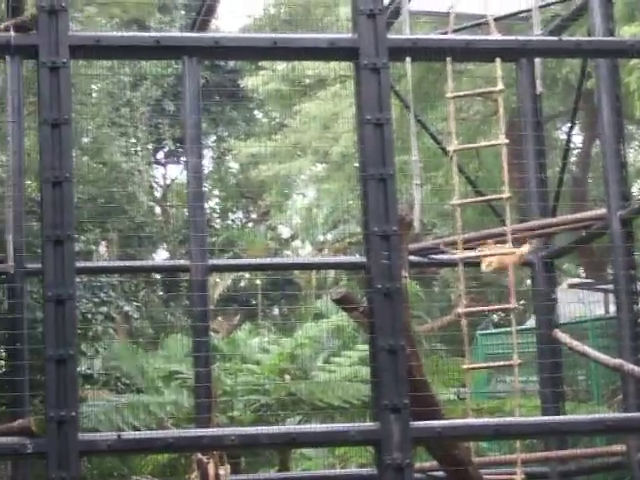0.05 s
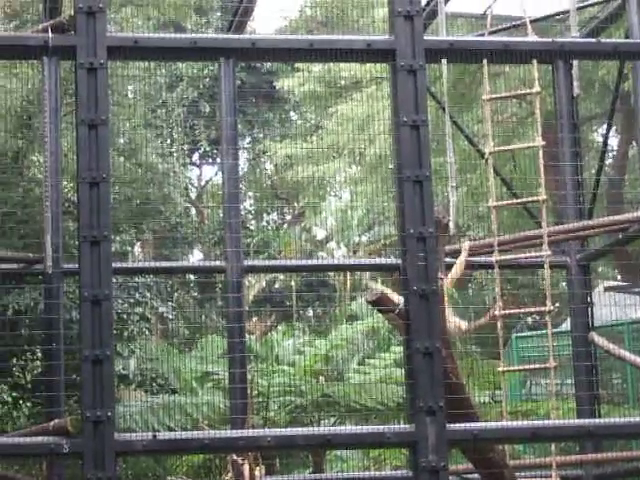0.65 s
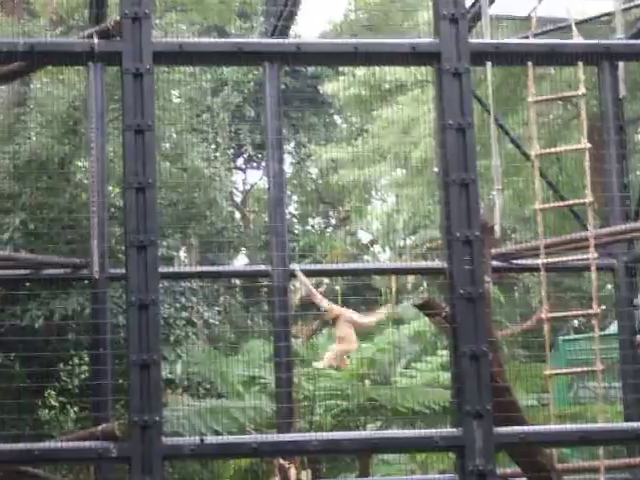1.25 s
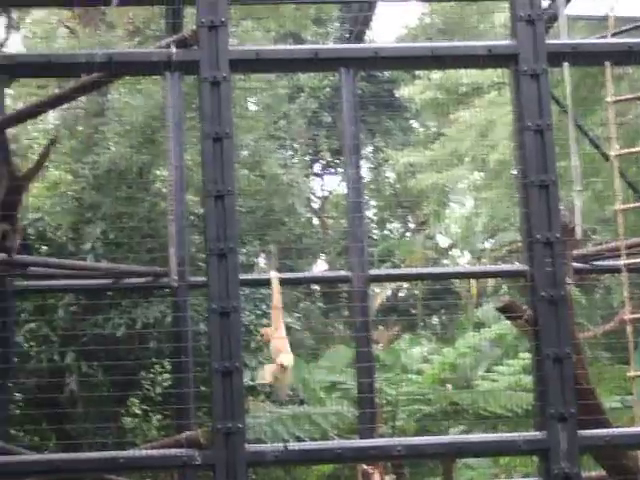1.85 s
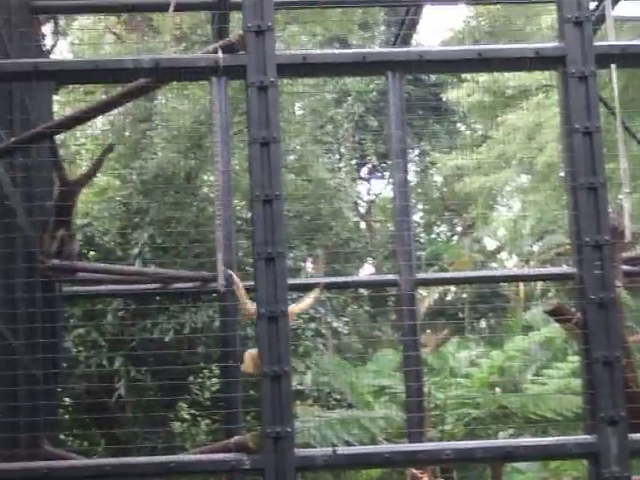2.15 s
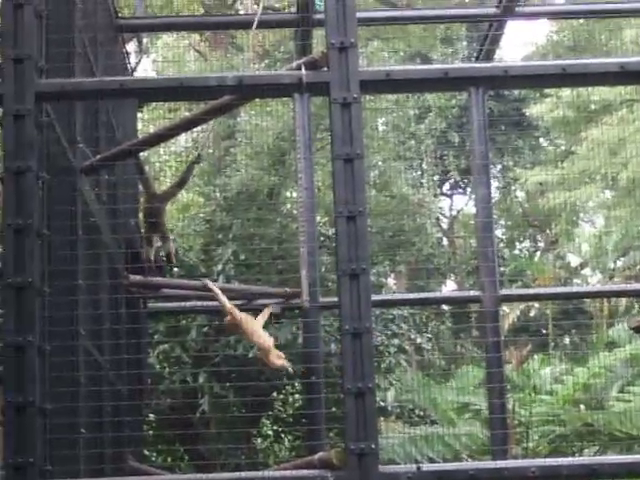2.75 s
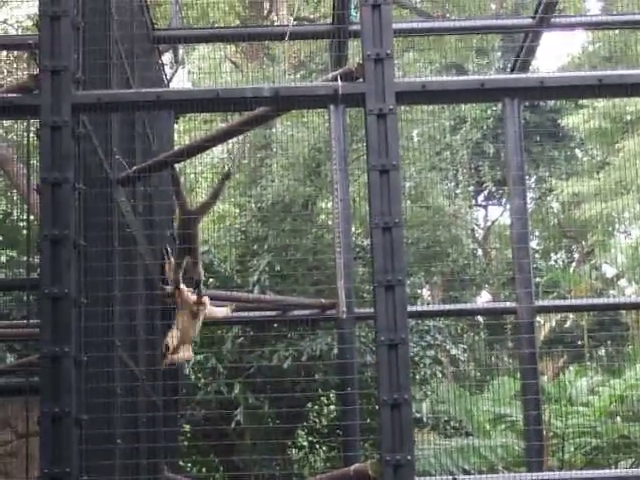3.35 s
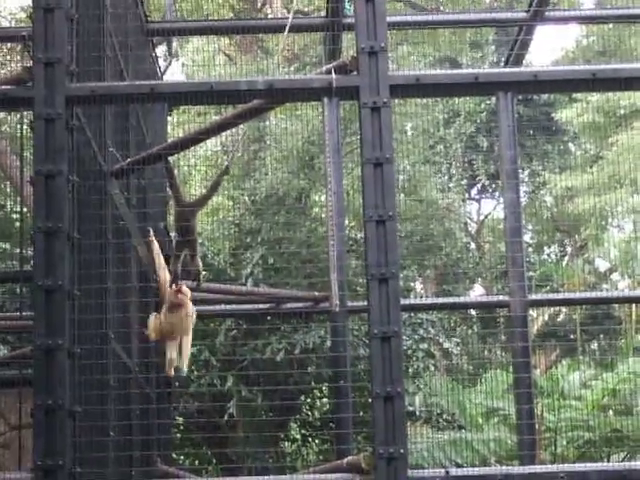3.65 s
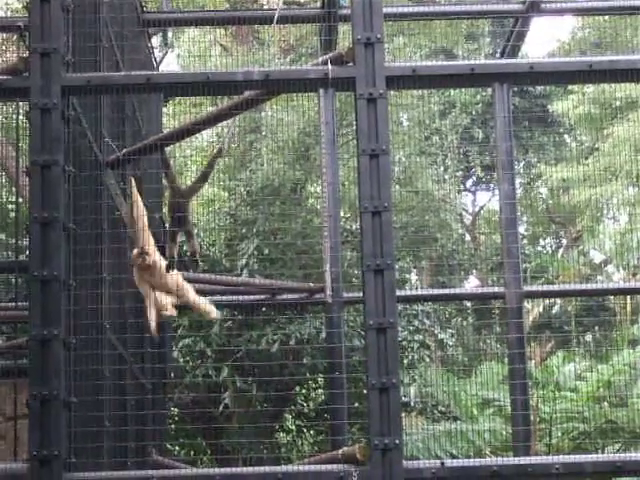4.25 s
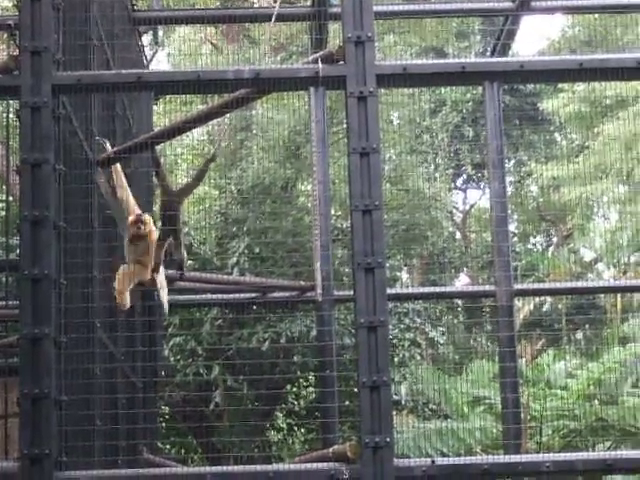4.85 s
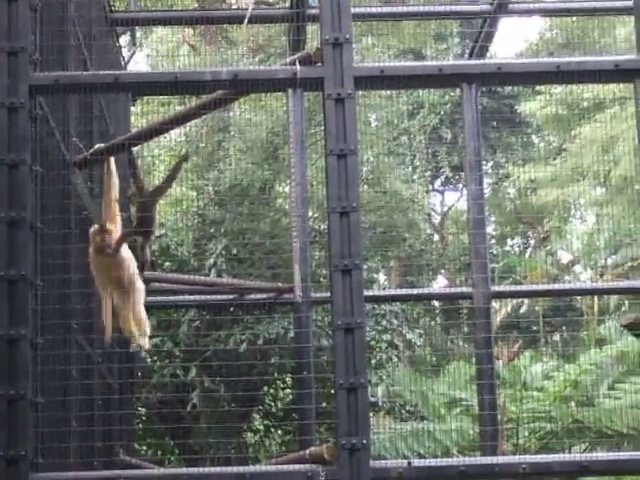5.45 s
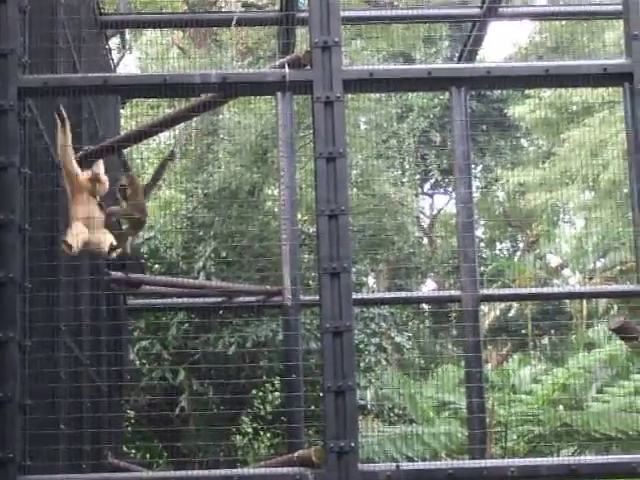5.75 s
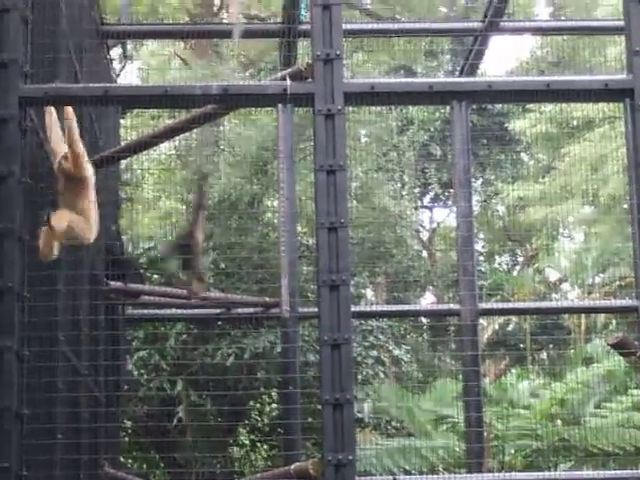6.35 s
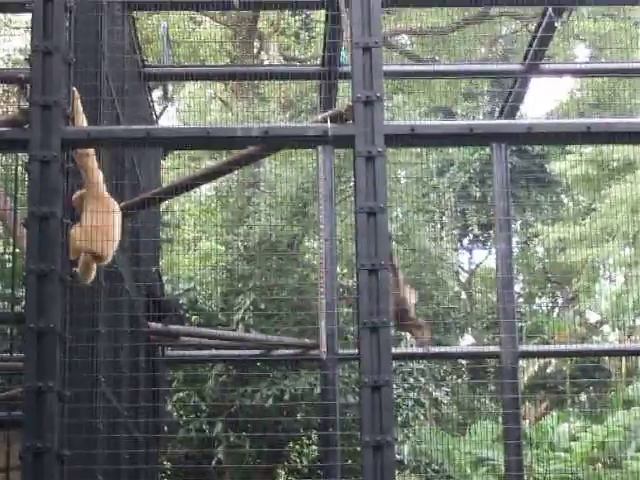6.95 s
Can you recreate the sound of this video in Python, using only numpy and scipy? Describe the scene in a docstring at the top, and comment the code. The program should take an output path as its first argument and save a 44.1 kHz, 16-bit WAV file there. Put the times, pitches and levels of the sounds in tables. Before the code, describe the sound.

Small birds chip and whistle in the trees around an outdoor cage, over a steady hiss of leaves and distant town with a faint machinery hum. Close to the microphone, a gibbon gives a gruff note that breaks into a short, piercing squeal. About three seconds later it squeals again, then grunts softly twice. The cries echo briefly off the cage and trees, and the mesh rustles faintly now and then.

```python
"""Gibbons calling in a tall outdoor cage, close to the microphone: twice a gruff onset breaks into a
piercing, arching squeal, then two soft grunts follow. The mesh rustles as an ape swings, and cage
walls and trees answer every call. Farther off, small birds chip and warble in the trees, over a
steady hiss of foliage and distant town with a faint machinery hum. Loud cries duck the microphone."""
import sys
import numpy as np
from scipy import signal
from scipy.fft import rfft, irfft, next_fast_len
from scipy.io import wavfile
from scipy.ndimage import uniform_filter1d, map_coordinates

SR = 44100
rng = np.random.default_rng(int(sys.argv[2]) if len(sys.argv) > 2 else 0)


def bounce(signal):
    """Save signal as a 16-bit WAV file at the path given by the first command-line argument."""
    frames = np.transpose(np.atleast_2d(signal))
    limited = np.clip(frames, -1, 1)
    pcm = np.round(limited * 32767).astype(np.int16)
    wavfile.write(sys.argv[1], SR, pcm)


N = 308259


def amp(db):
    """Decibels to gain."""
    return 10 ** (np.asarray(db) / 20)


def unit(x):
    """Scale to rms 1."""
    return x / np.sqrt(np.mean(x ** 2) + 1e-20)


def along(points, hz):
    """Read (freq_hz, value) points on a log frequency axis."""
    freqs, values = np.transpose(points)
    return np.interp(np.log(hz + 1), np.log(freqs + 1), values)


def wobble(rate, size):
    """A smooth random curve with `rate` knots a second."""
    knots = rng.standard_normal(int(size * rate / SR) + 4)
    return map_coordinates(knots, [np.arange(size) * rate / SR])


def filtered(x, response):
    """Shape x by a gain that is a function of frequency."""
    size = next_fast_len(len(x) + SR // 10)
    return irfft(rfft(x, size) * response(np.fft.rfftfreq(size, 1 / SR)), size)[:len(x)]


def noise(spectrum):
    """Noise of rms 1, coloured by (freq_hz, level_db) points."""
    return unit(filtered(rng.standard_normal(N), lambda hz: amp(along(spectrum, hz))))


def phase_of(hz):
    """Running phase of a moving pitch."""
    return 2 * np.pi * np.cumsum(hz) / SR


def add(track, start_s, sound):
    """Mix a sound into the track at start_s."""
    start = max(round(start_s * SR), 0)
    part = sound[:max(len(track) - start, 0)]
    track[start:start + len(part)] += part


# Spectrum of the air all around the microphone: freq_hz, level_db
HISS_SPECTRUM = [(12, -49.5), (20, -5), (43, 0.5), (96, -3), (124, -5), (145, -6), (259, -4), (352, -5.5),
                 (379, -6), (946, -9), (1700, -17.5), (2360, -16.5), (4560, -24), (7390, -26),
                 (8600, -34.5), (11200, -74), (18900, -120)]
# Its slow swell: time_s, gain_db
HISS_SWELL = [(0, -0.5), (1.5, 1.5), (2.8, -0.5), (3.999, 0.6), (5.5, -0.5), (7, 1)]
def foliage_and_town(level_db=-35.5, waver_db=0.78):
    """Surrounding leaves and the distant town merge into a gently wavering hiss."""
    swell_db = np.interp(np.arange(N) / SR, *np.transpose(HISS_SWELL))
    return amp(level_db + swell_db + waver_db * wobble(5.2, N)) * noise(HISS_SPECTRUM)


# Machinery a long way off: pitch_hz, level_db
HUM_TONES = [(96.5, -51), (194, -52.5)]
def machinery_hum(waver_db=3, drift=0.02005):
    """Two low tones of distant machinery, each wandering in level and pitch."""
    hum = np.zeros(N)
    for hz, db in HUM_TONES:
        gain = np.sqrt(2) * amp(db + waver_db * wobble(5, N))
        hum += gain * np.sin(phase_of(hz * (1 + drift * wobble(8, N))))
    return hum


# Spectrum of birds in the farthest trees: freq_hz, level_db
CHORUS_SPECTRUM = [(1500, -52.5), (2400, -6.5), (3100, 8), (3800, 1.5), (4600, -34.5), (6000, -61.5)]
def distant_chorus(level_db=-49, swell_db=2.6):
    """Birds too far off to tell apart blur into a swelling band."""
    return amp(level_db + swell_db * wobble(6.3, N)) * noise(CHORUS_SPECTRUM)


def bird_note(hz, buzz, waver=.018):
    """A wavering whistle along a pitch path; fast quavering turns it into a buzz."""
    size = len(hz)
    quaver = 1 + .09 * buzz * wobble(500, size)
    phase = phase_of(hz * quaver * (1 + waver * wobble(112.5, size)))
    return np.sqrt(2) * signal.windows.tukey(size, .6) * np.sin(phase)


# Buzzy glides, well back in the trees: start_s, length_s, mid_pitch_hz, glide_octaves, level_db, buzz_share
BUZZY_GLIDES = [(0, 0.066, 3664, 0, -38.5, .7), (.09, .17, 3850, .1, -44, .6),
                (0.284, 0.097, 3310, -0.46, -44, 0.5), (1.011, 0.15, 3540, -0.19, -47, 0.38),
                (1.255, .07, 3566, 0.35, -32.5, 0.57), (1.767, 0.074, 3156, 0.53, -35.5, 0.97),
                (2.28, 0.08, 3460, .22, -37.5, 0.68), (2.58, 0.023, 3467, .5, -41.5, 0.4),
                (3.203, 0.049, 3560, 1.4, -47, 0.45), (3.242, 0.085, 3640, .1, -42.5, 0.64),
                (3.484, 0.11, 3545, .18, -43, .9), (3.73, 0.053, 3550, .15, -33.5, 0.9),
                (3.986, 0.07, 4110, 0, -41, 0.6), (4.239, 0.033, 3325, 0.081, -37.5, 0.96),
                (4.518, 0.056, 3034, -0.66, -35.5, 0.64), (4.659, 0.072, 3060, 0.13, -40, .95),
                (4.934, 0.073, 3637, 0.27, -38, 0.67), (5.595, 0.049, 3470, -0.51, -41.5, .9),
                (5.687, .097, 3630, -0.69, -43, 0.76), (5.814, 0.079, 3290, -.55, -39, 0.7),
                (6.144, 0.091, 2540, -0.25, -43, 0.93), (6.337, 0.12, 3740, 0.38, -51, 0.28),
                (6.864, 0.051, 3680, 0.23, -36.5, .5)]
# Whistles from the same trees: start_s, length_s, pitch_hz, start_above_share, level_db
SLIDING_WHISTLES = [(.517, 0.063, 3380, .12, -40), (.62, .05, 2295, 0.081, -42.5),
                    (1.405, 0.051, 2490, .14, -36.5), (1.5, .05, 3316, 0.24, -39),
                    (1.572, 0.061, 2800, 0.16, -33.5), (2.506, .043, 2980, .07, -38.5),
                    (2.905, 0.082, 2685, .12, -45.5), (3.05, .11, 2980, .04, -40.5),
                    (3.7, 0.043, 2833, .13, -33.5), (3.87, 0.049, 2450, 0.051, -45),
                    (4.017, 0.044, 1950, -0.046, -45), (4.119, 0.05, 2850, -0.08, -40.5),
                    (4.178, 0.064, 2320, .03, -45), (4.275, 0.044, 2295, 0.036, -48),
                    (4.411, 0.047, 2290, 0.04, -43.5), (4.71, 0.059, 2690, 0.053, -37.5),
                    (6.509, 0.037, 3190, 0.092, -42)]
def songbirds(faint_count=16, faint_hz=2866, faint_octaves=0.35, faint_db=-49.5, settle_s=0.0223):
    """Songbirds trade buzzy glides and whistles that slide onto a held pitch, some faint and random."""
    song = np.zeros(N)
    for start_s, length_s, hz, octaves, db, buzz in BUZZY_GLIDES:
        glide_hz = hz * 2 ** (octaves * np.linspace(-.5, .5, int(length_s * SR)))
        add(song, start_s, amp(db) * bird_note(glide_hz, buzz))
    whistles = list(SLIDING_WHISTLES)
    for slot, (when, height) in enumerate(rng.random((faint_count, 2))):
        start_s = (slot + when) * N / SR / faint_count
        hz = faint_hz * 2 ** (faint_octaves * (2 * height - 1))
        whistles.append((start_s, 0.065, hz, .14, faint_db))
    for start_s, length_s, hz, above, db in whistles:
        t = np.arange(int(length_s * SR)) / SR
        slide_hz = hz * (1 + above * np.exp(-t / settle_s))
        add(song, start_s, amp(db) * bird_note(slide_hz, buzz=0.39))
    return song


def chip(top_hz, hold_s, sweep, glide_s=.0065, rise_s=0.012):
    """One note sweeps up with a slight buzz toward a thin high pitch."""
    t = np.arange(int((rise_s + hold_s) * SR)) / SR
    below = sweep * np.exp(-t / glide_s)
    hz = top_hz * (1 - below + (.002 + .15 * below) * wobble(1200, len(t)))
    swell = np.interp(t, [0, rise_s, rise_s + hold_s / 2, rise_s + hold_s], [0.33, 0.94, 0.62, 0.35])
    return np.sqrt(2) * swell * np.sin(phase_of(hz))


# Upswept chips in the nearer trees: start_s, top_hz, level_db, hold_s
BIRD_CHIPS = [(0, 7050, -30.5, 0.014), (.26, 6720, -25.5, 0.018), (0.542, 6540, -28.5, 0.032),
              (.914, 6430, -26.5, 0.034), (1.315, 6400, -27, 0.028), (1.913, 6480, -27.5, 0.031),
              (3.34, 5470, -36.5, 0.024), (3.459, 5720, -33.5, 0.019), (3.585, 5470, -35.5, .018),
              (3.705, 5570, -33.5, 0.013), (3.825, 5300, -39, 0.0058), (3.917, 4720, -37.5, 0.02)]
def small_birds(flick_db=-14, flick_lead_s=0.041):
    """Small birds chip, announcing each note with a faint, higher flick."""
    song = np.zeros(N)
    for start_s, top_hz, db, hold_s in BIRD_CHIPS:
        flick = chip(1.2 * top_hz, hold_s=0.012, sweep=0.36, glide_s=0.016)
        add(song, start_s - flick_lead_s, amp(db + flick_db) * flick)
        add(song, start_s, amp(db) * chip(top_hz, hold_s, sweep=.34))
    return song


# Mesh and leaves shaken at the cage: peak_s, length_s, level_db
MESH_SHAKES = [(1.172, .1, -48), (1.3, 0.12, -42), (2.592, .05, -43), (3.59, 0.016, -43),
               (4.75, 0.17, -48.5), (6.764, .14, -48)]
# Spectrum of their rustle: freq_hz, level_db
MESH_SPECTRUM = [(2000, -19), (4500, -4), (7500, -5), (9000, -17)]
def mesh_rustle(grain_db=3):
    """A swinging ape sets off brief, grainy shivers of mesh and leaves."""
    t = np.arange(N) / SR
    shake = sum(amp(db) * np.exp(-(2 * (t - peak_s) / length_s) ** 2)
                for peak_s, length_s, db in MESH_SHAKES)
    return shake * unit(noise(MESH_SPECTRUM) * amp(grain_db * wobble(320, N)))


def resonance(source, centre_hz, width_hz):
    """One vocal tract resonance: two band-passes in series, scaled to rms 1."""
    band = lambda hz: 1j * hz * width_hz / (centre_hz ** 2 - hz ** 2 + 1j * hz * width_hz)
    return unit(filtered(source, lambda hz: band(hz) ** 2))


# A gibbon's throat, mouth and ring resonances: centre_hz, width_hz
GRUNT_FORMANTS = [(480, 490), (1060, 580), (1800, 280)]
def grunt(length_s, start_hz, end_hz, levels_db, brighten_db, rough, jitter=.12, dark_share=0.22):
    """Uneven glottal pulses and rasp pass through tract resonances whose balance shifts in the note."""
    size = int(length_s * SR)
    phase = phase_of(np.linspace(start_hz, end_hz, size) * (1 + jitter * rough * wobble(400, size)))
    pulses = unit(sum(np.cos(harmonic * phase) for harmonic in range(1, 9)))
    rasp = unit(rng.standard_normal(size) * (1 + np.cos(phase)))
    source = ((1 - rough) * pulses + 2 * rough * rasp) * signal.windows.tukey(size, 0.6)
    mouth_tuning = (min(start_hz, end_hz) / 546) ** 0.65  # the mouth follows the pitch
    throat, mouth, ring = [
        amp(db) * resonance(source, hz * tuning, width_hz * tuning)
        for (hz, width_hz), db, tuning in zip(GRUNT_FORMANTS, levels_db, (1, mouth_tuning, 1))]
    whistle_gain = (end_hz / 720) ** 5.4 * amp(levels_db[0] - 24)  # comes out in notes that climb high
    whistle = whistle_gain * resonance(source, centre_hz=7600, width_hz=570)
    shift_db = brighten_db * np.linspace(-.5, .5, size)
    return amp(-dark_share * shift_db) * (throat + mouth) + amp(shift_db) * ring + whistle


# Gruff notes in the cage, near the microphone:
# start_s, length_s, start_hz, end_hz, throat_db, mouth_db, ring_db, brighten_db, rough_share
GRUNT_NOTES = [(1.948, 0.034, 335, 583, -33.5, -38, -32.5, 21, 0.68),
               (1.99, 0.038, 587.6, 639, -33, -25.5, -26, 2, 0.73),
               (2.261, 0.032, 329, 331, -36.5, -49, -48, -3, 0.5),
               (5.011, 0.046, 538, 866, -31.5, -47, -45, 6, 0.2),
               (5.043, 0.022, 824, 960, -33.5, -35, -24, 15, 0.26),
               (5.204, 0.041, 522, 461, -35, -27, -32, -3, .62),
               (5.905, 0.127, 466.3, 445.7, -42.5, -35.5, -36, -16, 0.49),
               (6.179, 0.111, 435, 470, -48.5, -41.5, -45, -16, 0.52)]
def gibbon_grunts():
    """Gruff notes brighten as they lead into a squeal; those that follow one darken."""
    voice = np.zeros(N)
    for start_s, length_s, start_hz, end_hz, *levels_db, brighten_db, rough in GRUNT_NOTES:
        add(voice, start_s, grunt(length_s, start_hz, end_hz, levels_db, brighten_db, rough))
    return voice


def squeal(top_hz, rise_s, dive_s, fundamental_db, octave_db, swell_db, dive_db, third_db,
           rough_start, rough_top):
    """A whistle that arches up and plunges; strain makes it shiver and wraps each partial in rasp."""
    start_share, bottom_hz, sag_hz_per_s = .56, 1168, 8870
    release_lead_s, release_db_per_s, die_s = .008, 301, .042
    flip_s, third_delay_s = 0.0092, 0.0076
    rough_bottom, jitter, rasp_db, flutter_db = 0.49, .045, -3, 6
    t = np.arange(-rise_s, dive_s + die_s, 1 / SR)  # zero at the top of the arch
    rise_left = np.clip(-t / rise_s, 0, 1)
    dive = np.clip(t / dive_s, 0, 1)
    drop = dive ** 1.1 + .065 * np.sin(2 * np.pi * dive)  # slackens midway, steepens toward the end
    dive_hz = top_hz - (top_hz - bottom_hz) * drop - sag_hz_per_s * np.maximum(t - dive_s, 0)
    hz = dive_hz * (1 - (1 - start_share) * rise_left ** 2)
    rough = np.interp(t, [-rise_s, 0, dive_s], [rough_start, rough_top, rough_bottom])
    effort = amp(-swell_db * rise_left - release_db_per_s * np.maximum(t - dive_s + release_lead_s, 0))
    # Just past the top, the strength flips from the octave to the fundamental.
    fundamental = amp(np.interp(t, [0, flip_s], [fundamental_db, dive_db]))
    overtones = amp(np.interp(t, [0, flip_s], [octave_db, dive_db - 4]))
    overtones *= np.where(t > 0, np.clip((hz - 1860) / 250, 0, 1), 1)  # gone once the dive hits 1860 Hz
    third = amp(third_db) * np.clip((t - third_delay_s) / flip_s, 0, 1)
    phase = phase_of(hz * (1 + jitter * rough * wobble(1100, len(t))))
    tone = fundamental * np.sin(phase) + overtones * (np.sin(2 * phase) + third * np.sin(3 * phase))
    rasp = 1 + amp(rasp_db) * rough * wobble(1500, len(t))
    flutter = amp(flutter_db * rough * wobble(243.7, len(t)))
    return np.sqrt(2) * effort * tone * rasp * flutter * signal.windows.tukey(len(t), .06)


# Squeals in the cage, near the microphone: top_s, top_hz, rise_s, dive_s, top_fundamental_db,
# top_octave_db, swell_db, dive_db, third_over_octave_db, rough_start_share, rough_top_share
SQUEAL_CALLS = [(2.055, 4076, .048, .074, -30.5, -22.5, 5, -21, -8, 0.8, 0.34),
                (5.093, 3224, .041, .072, -32.5, -14.5, 19, -23, -5, 0.6, 0)]
# Response of the squealing gibbon's throat and mouth: freq_hz, gain_db
SQUEAL_COLOUR = [(1000, -3), (1800, -1.5), (2200, -3.5), (2750, 1.5), (3600, -2.5), (4150, -5), (4700, 2),
                 (5350, -5.5), (5850, 0.5), (6400, -2), (6950, 3), (7600, 0.5), (8500, 1.5)]
def gibbon_squeals(gain_db=5):
    """Two piercing cries, coloured by throat and mouth."""
    voice = np.zeros(N)
    for top_s, top_hz, rise_s, *shape in SQUEAL_CALLS:
        add(voice, top_s - rise_s, squeal(top_hz, rise_s, *shape))
    return amp(gain_db) * filtered(voice, lambda hz: amp(along(SQUEAL_COLOUR, hz)))


# Reverberation of the cage and the trees around it: freq_hz, t60_s
TAIL_DECAY = [(200, 0.39), (700, 0.41), (1500, 0.71), (3000, 0.78), (6300, 0.7), (9000, 0.69)]
# Scatter reaching the microphone from the mesh, then the far side: delay_s, spread_s, level_db
CAGE_ECHOES = [(.006, 0.024, -1.5), (.075, 0.036, -20.5)]
def enclosure(x, direct_db, walls_db, tail_db, build_s=0.032):
    """Direct sound, dense scatter from the cage, and a tail that builds up among the trees."""
    hz, frame_s, spectra = signal.stft(rng.standard_normal(SR), SR, nperseg=256)
    decay = amp(-60 * frame_s / along(TAIL_DECAY, hz)[:, None])
    _, tail = signal.istft(spectra * decay, SR, nperseg=256)
    t = np.arange(len(tail)) / SR
    tail *= 1 - np.exp(-t / build_s)
    response = amp(tail_db) * tail / np.linalg.norm(tail)
    for delay_s, spread_s, db in CAGE_ECHOES:
        burst = rng.standard_normal(len(t)) * np.exp(-t / spread_s)
        add(response, delay_s, amp(db + walls_db) * burst / np.linalg.norm(burst))
    return amp(direct_db) * x + signal.fftconvolve(x, response)[:N]


def gain_control(x, threshold_db=-21, squeeze=0.63, release_db_per_s=35, attack_s=.008):
    """Loud cries turn the microphone's gain down a moment after they start; then it creeps back."""
    level_db = 10 * np.log10(np.abs(uniform_filter1d(x ** 2, size=300)) + 1e-12)
    excess_db = squeeze * np.maximum(level_db - threshold_db, 0)
    recovery_db = release_db_per_s * np.arange(N) / SR
    cut_db = np.maximum.accumulate(excess_db + recovery_db) - recovery_db
    lag = np.exp(-1 / (attack_s * SR))
    return x * amp(-signal.lfilter([1 - lag], [1, -lag], cut_db))


def scene():
    """From beside the cage: squeals fill it, grunts stay drier, birds are farther and more reverberant."""
    squeals = enclosure(gibbon_squeals(), direct_db=-1, walls_db=0.5, tail_db=-2)
    grunts = enclosure(gibbon_grunts(), direct_db=0.5, walls_db=1.5, tail_db=-11)
    near_birds = enclosure(small_birds(), direct_db=-4, walls_db=1, tail_db=-1.5)
    far_birds = enclosure(songbirds(), direct_db=0, walls_db=1, tail_db=1)
    ambience = distant_chorus() + mesh_rustle() + foliage_and_town() + machinery_hum()
    return (ambience + far_birds + near_birds + grunts + squeals)[None]


def record(dry):
    """One microphone with automatic gain; its treble ends steeply above 8 kHz."""
    band = lambda hz: amp(np.interp(hz, [7900, 8400, 8700, 9000, 9200], [0, -5, -14, -34, -120]))
    return filtered(gain_control(dry[0]), band)[None]


dry = scene()
out = record(dry)
bounce(out)
```